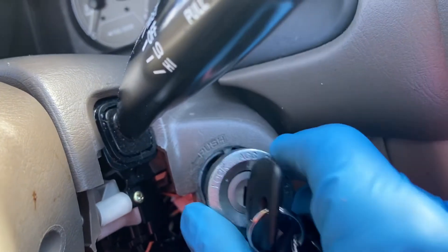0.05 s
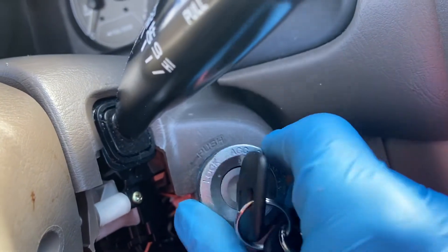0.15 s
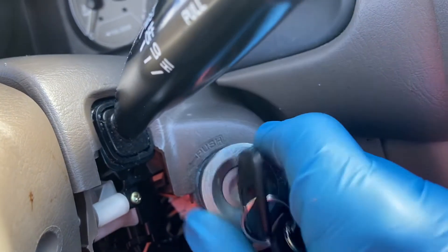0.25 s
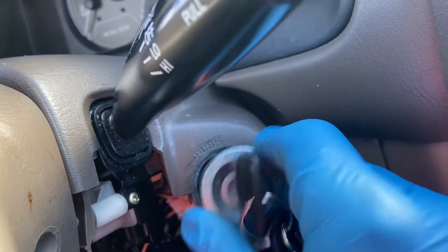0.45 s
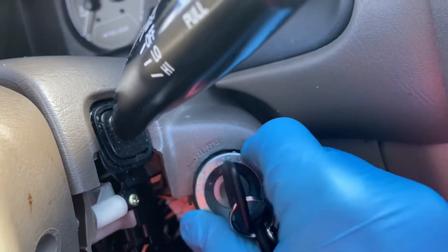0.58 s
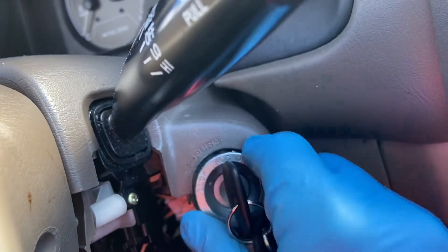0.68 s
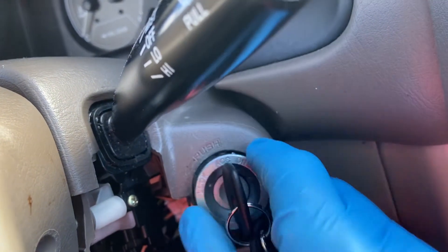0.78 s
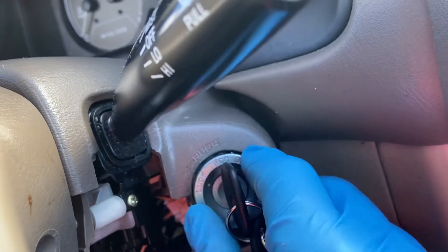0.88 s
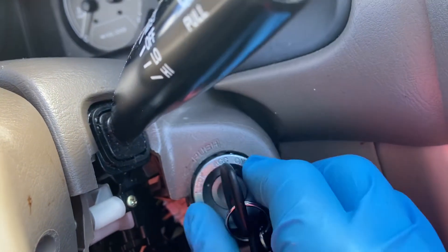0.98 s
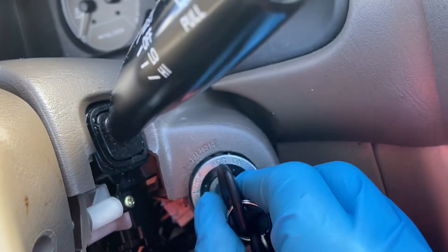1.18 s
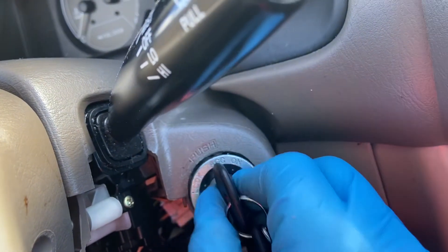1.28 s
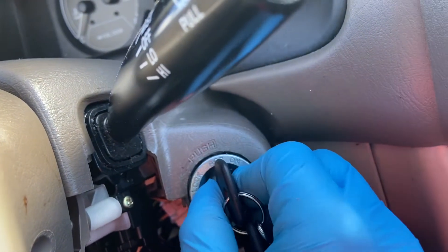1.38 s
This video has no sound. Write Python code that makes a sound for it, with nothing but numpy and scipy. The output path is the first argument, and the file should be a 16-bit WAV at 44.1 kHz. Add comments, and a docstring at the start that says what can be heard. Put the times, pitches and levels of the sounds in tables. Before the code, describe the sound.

A key and lock cylinder clatter into a car's steering column with clicks, knocks and scraping.

```python
"""A lock cylinder with its key in it is worked into a car's steering column, over quiet cabin air.
Each catch knocks the plastic column, rings the metal barrel and ticks the keys, as noise bursts with modes.
The barrel scrapes as trains of tiny slips; the column rumbles and shudders under the pushing hand.
The loudest catches come as it slides home, with tumblers and keys chattering.
Then softer catches, scraping and rumble go on while a glove rubs on the key."""
import sys
import numpy as np
from scipy import signal
from scipy.fft import rfft, irfft, next_fast_len
from scipy.io import wavfile

SR = 44100
rng = np.random.default_rng(int(sys.argv[2]) if len(sys.argv) > 2 else 0)


def persist_wave(psi):
    """Save psi, clipped to +-1, as 16-bit WAV."""
    counts = np.round(np.clip(psi, -1, 1) * 32767).astype(np.int16)
    wavfile.write(sys.argv[1], SR, np.atleast_2d(counts).T)


N = 63945

# catches of the cylinder, levels before each part's trim: (time [s], column thud [dB],
# hollow shroud knock [dB], plastic clack [dB], barrel ring [dB], key tick [dB])
CATCHES = [(0.002, -42, -57, -75, -85, -90), (0.0415, -41.5, -37, -43.5, -71, -80),
           (0.1191, -36, -32.5, -38.5, -62, -82), (0.182, -35, -37.5, -44, -51.5, -69),
           (0.2042, -36, -33, -31, -40, -33), (0.2115, -44, -29, -36, -57, -62),
           (0.2187, -41, -32, -57, -56, -75), (0.242, -28, -21, -19, -19, -29.5),
           (0.2468, -28, -21.5, -18, -10, -31), (0.248, -30, -21, -16, -18.5, -31),
           (0.2657, -38, -37, -26, -26.5, -41.5), (0.3109, -52, -47, -51, -42, -34),
           (0.316, -36, -29.5, -36, -63, -48.5), (0.327, -33, -34, -34, -37, -61),
           (0.3312, -33.5, -28, -26, -27.5, -65), (0.347, -43.5, -50, -45, -39, -37.5),
           (0.359, -48.5, -36, -31.5, -36, -58.5), (0.364, -37, -40, -42, -55, -69.5),
           (0.403, -44, -41, -45, -55, -73), (0.414, -32.5, -46, -60, -67, -63.5),
           (0.427, -36.5, -39, -41, -57, -53), (0.4325, -32, -20, -25, -45, -57.5),
           (0.436, -29, -26, -30, -38, -49), (0.447, -32, -29, -42, -48, -38),
           (0.459, -43, -31, -35, -32.5, -39), (0.4655, -31.5, -24, -16, -14.5, -33),
           (0.4675, -24, -25, -15, -21, -34), (0.472, -27, -27, -23, -31, -33.5),
           (0.478, -33, -29, -26, -33, -41), (0.4845, -23, -23, -21, -27.5, -43.5),
           (0.488, -26, -24, -24, -35, -44), (0.4917, -29, -23, -20, -32, -42),
           (0.4995, -24, -28, -28, -41, -48), (0.506, -25, -21, -16, -17.5, -27.5),
           (0.515, -26, -27, -29, -38, -45), (0.5213, -32, -22, -13, -17, -28),
           (0.5235, -30, -21, -18, -20, -36), (0.5295, -28, -24, -23, -35, -40.5),
           (0.538, -30, -31, -33, -43, -47), (0.548, -38.5, -31, -32, -48, -61),
           (0.585, -45.5, -61.5, -73, -65.5, -51.5), (0.6458, -42, -38, -36.5, -52, -58),
           (0.662, -47, -49.5, -60, -75, -53.5), (0.738, -57, -77, -80, -74, -61),
           (0.82, -59, -73, -80, -82, -85), (0.86, -52, -60, -59, -61, -73.5),
           (0.871, -54.5, -56, -56, -72, -73), (0.879, -55, -56, -56, -72, -73),
           (0.887, -56, -62, -62, -70, -58.5), (0.898, -52, -59, -63, -66, -66),
           (0.937, -63, -67, -62, -59.5, -57.5), (1.005, -60, -66, -67, -53, -48.5),
           (1.0145, -51, -57, -50, -73.5, -71.5), (1.036, -52, -64, -69, -73, -78),
           (1.155, -54, -61, -76, -89, -93.5), (1.193, -63, -63, -55, -57.5, -47),
           (1.207, -66, -65, -62, -63, -60), (1.249, -68.5, -70, -59, -76, -75.5),
           (1.276, -65, -65, -60.5, -69.5, -73.5), (1.2834, -62, -61, -60, -53, -62),
           (1.299, -40, -37.5, -45, -69, -68), (1.326, -47, -54, -51, -63, -72),
           (1.371, -63, -68, -56, -61, -60.5)]


def amp(db):
    """Decibels to gain."""
    return 10 ** (np.asarray(db) / 20)


def evened(x):
    """Scales to rms 1."""
    return x / np.sqrt(np.mean(x ** 2) + 1e-20)


def read(points, hz):
    """Interpolates (frequency [Hz], value) points on a log-frequency axis."""
    f_hz, value = np.transpose(points)
    return np.interp(np.log(hz + 1), np.log(f_hz + 1), value)


def level(points):
    """Gain at every sample from (time [s], level [dB]) points."""
    time_s, level_db = np.transpose(points)
    return amp(np.interp(np.arange(N) / SR, time_s, level_db))


def add(mix, start_s, sound):
    """Mixes a sound in at a time, cut at the end of the mix."""
    part = mix[:, max(round(start_s * SR), 0):][:, :sound.shape[1]]
    part += sound[:, :part.shape[1]]


def causal(points, size=4096):
    """Minimum-phase impulse response of energy 1: the given colour, no ringing before it."""
    log_gain = np.log(amp(read(points, abs(np.fft.fftfreq(size, 1 / SR)))))
    spectrum = np.exp(np.conj(signal.hilbert(log_gain)))
    taps = np.fft.ifft(spectrum).real[:size // 2]
    return taps / np.linalg.norm(taps)


def coloured(x, points):
    """Filters both channels with a colour."""
    return signal.fftconvolve(x, causal(points)[None], axes=1)[:, :x.shape[1]]


def ports(x):
    """Blends two versions of the sound into what two microphone ports hear."""
    # likeness of the ports: (frequency [Hz], coherence [0-1])
    likeness = [(50, .96), (250, .82), (700, .68), (2000, .72), (4300, .97), (7500, .92), (12000, .86)]
    # level difference of the ports: (frequency [Hz], left minus right [dB])
    lean_db = [(60, 0), (100, 0), (160, 5), (270, -1.5), (450, -1), (740, 2.5), (1220, 5), (2010, 6.5),
               (3330, 2.5), (5500, 2.5), (9080, 0), (15000, -.5)]
    # phase between the ports: (frequency [Hz], left leads by [rad])
    lead_rad = [(60, 0), (860, 0.7), (1380, 1.56), (1810, 0.86), (3620, 0.67), (7600, 1), (8400, -2.5),
                (11500, -6.5), (15200, -12)]
    size = next_fast_len(N + SR // 4)
    hz = np.fft.rfftfreq(size, 1 / SR)
    a, b = rfft(x, size)
    same = np.clip(read(likeness, hz), 0, 1)
    lean = amp(read(lean_db, hz))
    right = same * a + np.sqrt(1 - same ** 2) * b
    right = right * np.exp(-1j * read(lead_rad, hz))
    power_keeping = np.sqrt(2 / (1 + lean ** 2))
    return irfft(np.array([a * lean, right]) * power_keeping, size)[:, :N]


def part_of_catches(column, colour, dying, modes, rise_per_s=0):
    """One part of every catch: a crack, a rattle of dense resonances, a cabin tail and clear modes."""
    # softening: mode dB lost per dB of softer blow (negative: soft blows ring cleaner)
    trim_db, rise_s, early_t60_s, tail_db, tail_t60_s, modes_db, softening, crack_db = dying
    mode_scatter_db = 1.5
    levels_db = np.transpose(CATCHES)[column]
    hardest = np.argmax(levels_db)
    t, out = np.arange(SR // 6) / SR, np.zeros((2, N))
    onset = 1 - np.exp(-t / rise_s)
    early = np.exp(-np.log(1000) * t / early_t60_s)
    tail = amp(tail_db) * np.exp(-np.log(1000) * t / tail_t60_s)
    shape = onset * (early + tail)
    shape /= shape.max()
    size = np.linalg.norm(shape)
    hz, mode_db, t60_s = np.transpose(modes)[:, :, None]
    for row, db in zip(CATCHES, levels_db):
        pitch = 1 + rise_per_s * (row[0] - CATCHES[hardest][0])
        blow = shape * rng.standard_normal((2, len(t)))
        blow[0, 0] += amp(crack_db) * size
        dense = coloured(blow, [(f_hz * pitch, gain_db) for f_hz, gain_db in colour])
        dense *= size / np.linalg.norm(dense, axis=1, keepdims=True)
        rings = amp(mode_db) * onset * np.exp((2j * np.pi * hz * pitch - np.log(1000) / t60_s) * t)
        struck = amp(mode_scatter_db * rng.standard_normal((2, len(modes)))) + 0j
        # the second version's modes start at random phases
        struck[1] *= np.exp(2j * np.pi * rng.random(len(modes)))
        clear = (struck @ rings).imag
        burst = dense + amp(modes_db + softening * (db - levels_db[hardest])) * clear
        burst *= size / np.linalg.norm(burst, axis=1, keepdims=True)
        add(out, row[0], amp(trim_db + db) * burst)
    return out


def column_thuds():
    """The steering column thuds in its low modes at each catch."""
    # thud colour: (frequency [Hz], level [dB])
    colour = [(50, -25), (115, -3.5), (150, -2), (205, -5), (320, 0), (450, 0), (600, -8), (900, -33.5),
              (2000, -73.5)]
    # rise and decay: (trim [dB], rise [s], early t60 [s], cabin tail [dB], tail t60 [s],
    # clear modes [dB], softening [dB/dB], first crack [dB])
    dying = (-1, .004, .08, -14, .2, -2, -.2, -14)
    # column modes: (frequency [Hz], level [dB], t60 [s])
    modes = [(144, -3, .13), (292, -7, .08), (378, 0, .08), (455, -7, .11), (567, -10, .11)]
    return part_of_catches(1, colour, dying, modes)


def shroud_knocks():
    """The hollow of the column's shroud knocks at each catch."""
    # knock colour: (frequency [Hz], level [dB])
    colour = [(250, -34), (560, -11), (720, -5), (835, 0), (950, -5), (1100, -1.5), (1350, -11),
              (2300, -50)]
    # rise and decay: (trim [dB], rise [s], early t60 [s], cabin tail [dB], tail t60 [s],
    # clear modes [dB], softening [dB/dB], first crack [dB])
    dying = (0, .0012, .04, -16, .125, -1.5, -.6, -7)
    # hollow modes: (frequency [Hz], level [dB], t60 [s])
    modes = [(800, -7, .04), (850, 1, .05), (1055, -5, .07), (1150, -10, .06)]
    return part_of_catches(2, colour, dying, modes)


def plastic_clacks():
    """The shroud's plastic walls clack at each catch."""
    # clack colour: (frequency [Hz], level [dB])
    colour = [(600, -30), (1150, -6), (1450, 0), (1720, -2), (2030, -.5), (2300, -10), (2600, -19),
              (3200, -38), (6000, -68)]
    # rise and decay: (trim [dB], rise [s], early t60 [s], cabin tail [dB], tail t60 [s],
    # clear modes [dB], softening [dB/dB], first crack [dB])
    dying = (-.5, .0005, .03, -14, .11, -2.5, -.1, -4)
    # wall modes: (frequency [Hz], level [dB], t60 [s])
    modes = [(1380, -11, .06), (1530, -5, .05), (1650, -10, .05), (1872, -7, .045), (1985, -9, .045),
             (2112, -9, .06), (2375, -17, .07)]
    return part_of_catches(3, colour, dying, modes)


def barrel_rings():
    """The metal barrel rings at each catch, higher the deeper it sits in the bore."""
    # ring colour: (frequency [Hz], level [dB])
    colour = [(1500, -32), (2300, -9), (2700, -5), (3350, -18), (3700, -8), (3950, -7), (4290, 3),
              (4650, -7), (5200, -15), (5800, -15), (6500, -19), (7600, -19), (8800, -36), (13000, -56)]
    # rise and decay: (trim [dB], rise [s], early t60 [s], cabin tail [dB], tail t60 [s],
    # clear modes [dB], softening [dB/dB], first crack [dB])
    dying = (-1.7, .0007, .012, -18, .075, 0, .45, -10)
    # barrel modes, at the pitch of the hardest ring: (frequency [Hz], level [dB], t60 [s])
    modes = [(2538, -10, .07), (2783, -10, .04), (4151, -5, .03), (4305, 2, .022), (4400, -13, .05)]
    return part_of_catches(4, colour, dying, modes, rise_per_s=.04)  # share of pitch per s


def key_ticks():
    """The keys tick in their high modes at each catch."""
    # tick colour: (frequency [Hz], level [dB])
    colour = [(3000, -40), (5000, -16), (7200, -11), (9000, -21), (10200, -2.5), (11400, -3.5),
              (13300, -10), (15300, -6), (16500, -11)]
    # rise and decay: (trim [dB], rise [s], early t60 [s], cabin tail [dB], tail t60 [s],
    # clear modes [dB], softening [dB/dB], first crack [dB])
    dying = (1, .0003, .015, -17, .075, -1, 0, -8)
    # key modes: (frequency [Hz], level [dB], t60 [s])
    modes = [(7400, -13, .03), (10300, -11, .03), (11300, -8, .03), (15400, -9, .025)]
    return part_of_catches(5, colour, dying, modes)


def rumble():
    """The column shudders at its wavering low resonance as the hand pushes, over a broader rumble."""
    # push of the hand, before the two gains below: (time [s], level [dB])
    push = [(0, -47), (.05, -48), (.105, -53), (.135, -44), (.19, -39), (.25, -32), (.28, -39), (.305, -29),
            (.355, -40), (.42, -42), (.475, -34), (.52, -26), (.56, -34), (.595, -33), (.625, -42),
            (.665, -37), (.705, -39), (.735, -52), (.77, -47), (.83, -58), (.9, -50), (.958, -37.5),
            (.985, -48), (1.02, -44), (1.09, -59), (1.132, -45), (1.19, -60), (1.27, -55), (1.33, -45),
            (1.36, -53), (1.45, -56)]
    # rumble colour: (frequency [Hz], level [dB])
    colour = [(15, -27), (30, -12), (55, -4), (80, 1), (120, -5), (170, -19), (250, -31), (350, -33),
              (500, -49), (1000, -66), (3000, -88)]
    rumble_db, shudder_db = -3, -6
    shudder_hz, wander_share, wander_s = 83, .13, .04
    shake = evened(coloured(rng.standard_normal((2, N + SR)), colour)[:, SR:])
    smoother = np.hanning(round(wander_s * SR))
    drift = evened(signal.fftconvolve(rng.standard_normal(N), smoother, "same"))
    phase_rad = 2 * np.pi * np.cumsum(shudder_hz * (1 + wander_share * drift)) / SR
    shudder = np.sqrt(2) * np.sin(phase_rad)
    return level(push) * (ports(amp(rumble_db) * shake) + amp(shudder_db) * shudder)


def friction(curve, colour, per_s, spread_db):
    """Many tiny slips of uneven size and random sign, at random times."""
    size_db = spread_db * np.minimum(rng.exponential(1, N), 4)
    slips = (rng.random(N) < per_s / SR) * amp(size_db)
    signed = slips * rng.choice([-1., 1.], (2, N))
    return level(curve) * evened(coloured(signed, colour))


def scrape():
    """The barrel slips along its bore."""
    # scraping: (time [s], level [dB])
    curve = [(0, -68), (.03, -73), (.165, -75), (.2, -49.5), (.29, -51), (.385, -57), (.425, -42),
             (.46, -34), (.5, -31), (.535, -36), (.575, -51), (.62, -65), (.7, -69), (.835, -67),
             (.875, -56), (.92, -65), (.99, -71), (1.045, -66), (1.085, -84), (1.18, -88), (1.22, -72),
             (1.29, -63), (1.38, -64), (1.45, -72)]
    # scrape colour: (frequency [Hz], level [dB])
    colour = [(100, -14.5), (340, 1), (520, -6), (900, -3.5), (1500, -1), (2100, -11.5), (3300, -25.5),
              (4300, -15.5), (5200, -21), (7500, -23.5), (9000, -33.5), (11000, -22.5), (13300, -35),
              (15500, -26)]
    return friction(curve, colour, per_s=1700, spread_db=3.6)


def cabin_air():
    """Still cabin air: steady coloured noise."""
    # air colour: (frequency [Hz], level [dB])
    colour = [(15, -12), (35, -5), (70, 2), (200, -7), (330, -2), (440, -19), (1500, -28), (3300, -39),
              (8000, -42), (16000, -43)]
    air_db = -62
    return amp(air_db) * evened(coloured(rng.standard_normal((2, N)), colour))


def chatter():
    """Loose tumblers and keys chatter in sparse slips while the barrel slides home."""
    # chattering: (time [s], level [dB])
    curve = [(.42, -90), (.445, -58), (.47, -41), (.5, -43), (.53, -41), (.555, -60), (.6, -95)]
    # chatter colour: (frequency [Hz], level [dB])
    colour = [(1000, -25), (2300, 0), (3300, -13), (4300, 1), (5300, -9), (7500, -9), (9000, -22),
              (11000, -8), (15500, -15)]
    return friction(curve, colour, per_s=900, spread_db=3)


def glove_rub():
    """A glove rubs on the key in dense slips."""
    # rubbing: (time [s], level [dB])
    curve = [(0, -84), (.6, -79), (.76, -70.5), (.795, -69), (.83, -84), (.9, -64), (.92, -65), (.94, -57),
             (.975, -70), (1.008, -58), (1.03, -72), (1.09, -77), (1.135, -83), (1.18, -94), (1.22, -76),
             (1.33, -73), (1.45, -79)]
    # rub colour: (frequency [Hz], level [dB])
    colour = [(500, -12), (2000, -3.5), (3200, -9), (4600, -0.5), (7300, -1), (9000, -8), (11200, 0.5),
              (13300, -10), (15400, -2), (16500, -7)]
    return friction(curve, colour, per_s=7600, spread_db=3)


def scene():
    """Catches, rumble, scraping, chatter and rubbing in a quiet cabin."""
    catches = column_thuds() + shroud_knocks() + plastic_clacks() + barrel_rings() + key_ticks()
    rubbing = scrape() + chatter() + glove_rub()
    return ports(catches + rubbing + cabin_air()) + rumble()


def record(dry):
    """Limits the band with a linear-phase low-pass."""
    edge_hz = 16100
    taps = signal.firwin(255, edge_hz, window=("kaiser", 8), fs=SR)
    return signal.oaconvolve(dry, taps[None], "same")


dry = scene()
out = record(dry)
persist_wave(out)
```